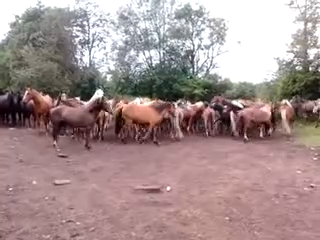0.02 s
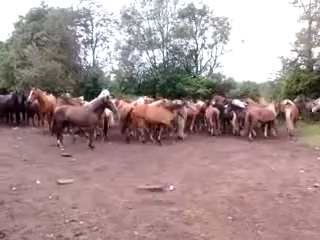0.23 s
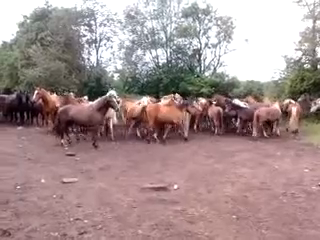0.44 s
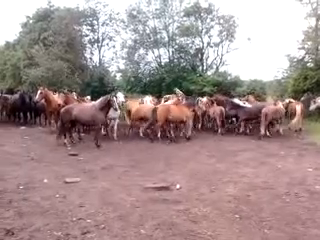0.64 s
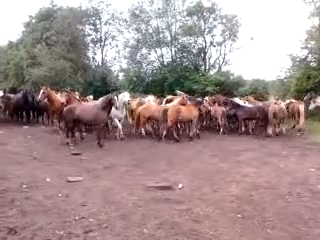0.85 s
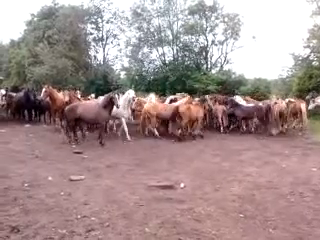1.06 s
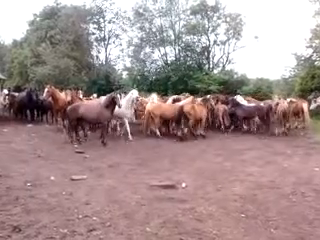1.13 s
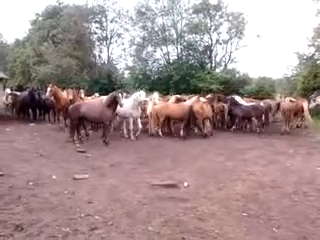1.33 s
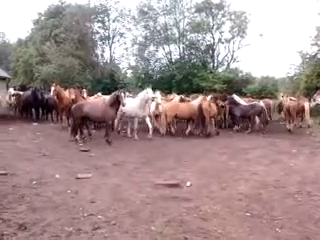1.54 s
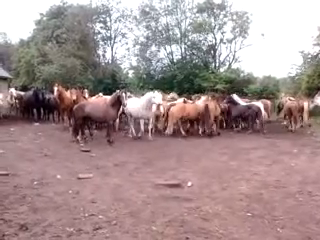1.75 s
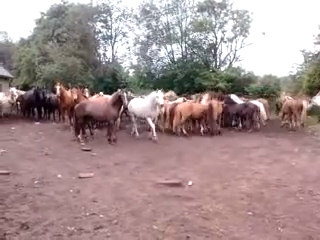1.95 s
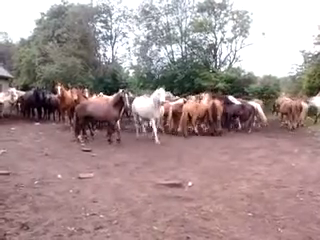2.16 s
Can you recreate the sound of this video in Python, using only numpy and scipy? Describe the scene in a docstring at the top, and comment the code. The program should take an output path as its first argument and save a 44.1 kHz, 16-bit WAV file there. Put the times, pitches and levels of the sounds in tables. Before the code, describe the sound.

One shrill horse whinny sinks into a low fluttering snort over faint outdoor noise.

```python
"""In an open paddock a horse whinnies once. The call is biphonic: a high whistle and a lower voice sound
together in the throat, and one modulates the other into sum tones. It roughens, sinks and breaks into
hoarse pulses over low grunts, while air hisses through the nose and the nostrils flutter and snap.
Soft moans frame the call. A faint rush of air follows over steady outdoor noise, and a low rumble
starts at the very end."""
import sys
import numpy as np
from scipy import signal
from scipy.fft import rfft, irfft, next_fast_len
from scipy.io import wavfile
from scipy.ndimage import uniform_filter1d

SR = 44100
rng = np.random.default_rng(int(sys.argv[2]) if len(sys.argv) > 2 else 0)


def generate_wav(sig):
    """Save sig (samples, or channels by samples) to the path in sys.argv[1] as 16-bit PCM at SR."""
    pcm = np.round(np.clip(np.atleast_2d(sig).T, -1, 1) * 32767).astype(np.int16)
    wavfile.write(sys.argv[1], SR, pcm)


N = 97020
T = np.arange(N) / SR

# the two fundamentals of the call: t/s, voice f/Hz, whistle f/Hz
PITCH = [(.095, 644.5, 833), (.13, 580, 1196), (.198, 516, 1180), (.25, 661, 1345), (.288, 581.4, 1315),
         (.322, 584.3, 1311), (.352, 668, 1365), (.398, 606, 1345), (.45, 679.2, 1365), (.525, 600, 1315),
         (.56, 684.7, 1360), (.618, 608, 1445), (.636, 502.4, 1137), (.68, 627.3, 1378),
         (.722, 648.2, 1399), (.755, 485.6, 1164), (.79, 509.2, 1174), (.825, 575.8, 1263),
         (.9, 490, 983.3), (.955, 489.1, 1188), (1.03, 431.3, 898), (1.11, 520, 1048)]
# envelope of the call: t/s, level/dB
CALL_LEVEL = [(.085, -42), (.14, -24), (.205, -17.5), (.228, -21.5), (.246, -24.5), (.275, -22.5),
              (.33, -26.5), (.43, -23), (.54, -24), (.63, -21.5), (.69, -24.5), (.76, -22), (.85, -23),
              (.9, -24.5), (.97, -21.5), (1.06, -33.5)]
# texture of the call: t/s, gain of voice and sum tones/dB, roughness (0-1)
TEXTURE = [(.1, -32, 0.42), (.165, -27, 0.2), (.195, -5.5, 0.16), (.23, -13, .15), (.265, -5, 0.72),
           (.4, -5, 0.87), (.56, -1, 0.45), (.76, -5, 0.69), (.9, -3, 1)]
# the folds lock and the call surges clear: centre t/s, gain/dB
SURGES = [(.305, 7), (0.357, 4.5), (0.456, 5), (.72, 3), (.855, 2.5), (.953, 4)]
# formants of throat and nose: f/Hz, gain/dB
FORMANTS = [(300, -27), (520, -6), (720, -7), (1200, 1.5), (1380, -8.5), (1650, 7.5), (1830, 3),
            (2050, 8.5), (2430, -14.5), (2740, 6), (3000, -8), (3300, -1), (4700, -26.5), (5800, -1),
            (9500, -25.5)]
# hoarse pulses ending the call: centre t/s, half-width/s, level/dB
PULSES = [(1.099, 0.046, -23), (1.234, 0.05, -24.5), (1.366, 0.038, -32), (1.509, 0.037, -35)]
# their resonances: f/Hz, gain/dB
PULSE_COLOUR = [(300, -6), (620, -7.5), (930, 2.5), (1330, -8), (1600, 7), (1830, -8.5), (2150, 6.5),
                (2500, -13.5), (3200, -5), (5000, -31)]
# grunts of the throat: centre t/s, f/Hz, level/dB
GRUNTS = [(.91, 160, -30), (1.005, 185, -32), (1.062, 175, -35), (1.115, 204.2, -31.5), (1.25, 165, -33),
          (1.515, 143, -30)]
# air through the nose: t/s, level/dB
AIR_LEVEL = [(.1, -76), (.17, -46), (.3, -39), (.55, -37), (.6, -33), (.65, -37.5), (.715, -32),
             (.77, -43.5), (.83, -31), (.92, -39.5), (1.01, -37), (1.22, -48.5), (1.54, -41), (1.6, -60)]
# spectrum of that air: f/Hz, gain/dB
AIR_COLOUR = [(2500, 2), (4800, -8), (6600, -8.5), (8100, 2), (9500, -14), (15500, -34)]
# nostril flutter: t/s, level/dB
FLUTTER_LEVEL = [(.87, -42), (.9, -36), (1.1, -38.5), (1.29, -29), (1.43, -35.5), (1.56, -34.5),
                 (1.63, -46.5)]
# resonances of the nose: f/Hz, gain/dB
NOSE_COLOUR = [(55, -13.5), (165, 1), (350, -3.5), (1300, -23.5), (1620, -3), (2500, -29), (8000, -29),
               (14000, -41.5)]
# snaps of the nostrils: t/s, level/dB
SNAPS = [(1.417, -20), (1.437, -17.5), (1.564, -22), (1.587, -24.5)]
# ring of a snap: f/Hz, gain/dB
SNAP_COLOUR = [(1100, -26), (1620, 0), (2050, 4), (2400, -15), (8200, -28), (13000, -60)]
# spits of air from the nose: t/s, level/dB
SPITS = [(1.162, -29), (1.295, -26.5)]
# low puffs between the pulses: centre t/s, level/dB
PUFFS = [(1.175, -40), (1.31, -35), (1.45, -35), (1.56, -41)]
# spectrum of a puff: f/Hz, gain/dB
PUFF_COLOUR = [(30, -29), (62, -9), (95, -12), (200, -24.5)]
# moans: start t/s, duration/s, start f/Hz, end f/Hz, level/dB
MOANS = [(.01, 0.12, 730, 598, -40.5), (1.565, 0.15, 580, 526, -44), (1.634, 0.081, 716, 680, -42)]
# resonances of the nearly closed mouth: f/Hz, gain/dB
MOAN_COLOUR = [(600, -4.5), (1400, -17), (2050, -11.5)]
# rush of air after the call: t/s, level/dB
RUSH_LEVEL = [(1.6, -49.5), (1.98, -45.5), (2.12, -55.5)]
# spectrum of the rush: f/Hz, gain/dB
RUSH_COLOUR = [(1200, -11), (1520, 5.5), (2300, -1), (4300, -3), (5700, -24), (8000, -13)]
# closing rumble: t/s, level/dB
RUMBLE_LEVEL = [(2.11, -66), (2.16, -39), (2.195, -29)]
# spectrum of the rumble: f/Hz, gain/dB
RUMBLE_COLOUR = [(70, 14.5), (200, 7.5), (550, -20.5), (3000, -27)]
# spectrum of the outdoor noise: f/Hz, gain/dB
OUTDOOR_COLOUR = [(30, -1.5), (70, 7.5), (155, 4), (230, -2), (750, -2.5), (1100, -7), (8700, -8.5),
                  (10500, -20), (15500, -29)]

WAVER, JITTER = .0024, .0098  # relative pitch spread: constant part, part at full roughness
RASP_HZ, SLIP_HZ = 152, 70  # bandwidths of pitch jitter and phase slip
NASAL_MODES_HZ, NASAL_WIDTH_HZ = (5420, 5855, 6670, 7300, 8030), 250


def whinny():
    """Source and filter: the larynx excites the formants, then drives the closing hoarse pulses."""
    source = larynx()
    surge_db = sum(db * swell(at, .012) for at, db in SURGES)
    call = even(colour(source, FORMANTS), size=900) * envelope(CALL_LEVEL) * undb(surge_db)
    return call + hoarse_pulses(source) + shriek()


def larynx(voice_db=-3.5, growl_hz=150):
    """Biphonation: the voice modulates the whistle, giving tones at the sums of their frequencies."""
    locked = sum(swell(at, .012) for at, _ in SURGES)
    rough = np.clip(curve(TEXTURE, column=2) * (1 - locked), 0, 1)
    voice_gain = undb(curve(TEXTURE) + 5 * locked)
    # uneven beating of the folds splits the tones into sidebands
    growl = overtones(growl_hz * (1 + .2555 * wobble(39.8)), 0, count=1)
    voice_hz = curve(PITCH) * jitter(rough)
    whistle_hz = curve(PITCH, column=2) * jitter(rough)
    voice = signal.hilbert(overtones(voice_hz, -4, count=14))
    whistle = signal.hilbert(overtones(whistle_hz, -8, count=6))
    # multiplying analytic signals adds their frequencies
    sum_tones = whistle * signal.hilbert(overtones(voice_hz, -11, count=3))
    parts = whistle, voice_gain * undb(voice_db) * voice, voice_gain * sum_tones
    return sum(rasp(part, rough, growl) for part in parts)


def jitter(rough):
    """Frequency modulation: a random pitch factor that spreads wider as the call roughens."""
    return 1 + WAVER * wobble(74) + JITTER * rough * wobble(RASP_HZ)


def rasp(tone, rough, growl, slip_rad=1.5):
    """Amplitude and phase modulation break up an analytic tone where the call is rough."""
    amplitude = 1 + rough * (.8 * wobble(2 * RASP_HZ) + .65 * growl)
    slip = slip_rad * rough ** 2.2 * wobble(SLIP_HZ)
    return np.real(tone * amplitude * np.exp(1j * slip))


def hoarse_pulses(source, air_db=6, close_at_s=1.27, closing_s=.071, closed_hz=1300):
    """Aspiration noise outweighs the voice; the closing mouth low-passes the last pulses."""
    breathy = (unit(source) + undb(air_db) * rng.standard_normal(N)) * undb(2 * wobble(89))
    bright = even(colour(breathy, PULSE_COLOUR))
    dull = even(lowpass(bright, closed_hz))
    closed = np.clip((T - close_at_s) / closing_s, 0, 1)
    pulses = sum(undb(db) * swell(at, half) for at, half, db in PULSES)
    return pulses * even((1 - closed) * bright + closed * dull)


def shriek():
    """The whistle's second harmonic rings out at the height of the call."""
    hz = 2 * curve(PITCH, column=2) * (1 + WAVER * wobble(RASP_HZ))
    octave = unit(overtones(hz, 0, count=1)) * (1 + .5 * wobble(SLIP_HZ))
    return undb(-26.5) * swell(.43, .1) * octave


def grunts():
    """Aperiodic voicing: short, unsteady low notes of the throat under the end of the call."""
    out = 0
    for at, hz, db in GRUNTS:
        tone = unit(overtones(hz * (1 + .1 * wobble(50)), -9, count=4))
        out = out + undb(db) * swell(at, .028) * tone
    return out


def nasal_air():
    """Air hisses through the nose, whose narrow modes resonate with the overtones of the voice."""
    hiss = noise(AIR_COLOUR) * undb(1.5 * wobble(54))
    voice_hz = curve(PITCH) * (1 + .0107 * wobble(RASP_HZ))
    buzz = overtones(voice_hz, 0, count=17) + rng.standard_normal(N)
    modes = [signal.iirpeak(hz, hz / NASAL_WIDTH_HZ, fs=SR) for hz in NASAL_MODES_HZ]
    ring = even(sum(signal.lfilter(b, a, signal.lfilter(b, a, buzz)) for b, a in modes))
    fade = np.clip((1 - T) / .33, 0, 1)  # gone by 1 s, as the call sinks
    return envelope(AIR_LEVEL) * (hiss + undb(2) * ring * fade)


def nostril_flutter(flap_hz=65.84, leak_decay_s=.0093):
    """Impulse excitation: uneven flaps ring the nose, each letting out a decaying leak of air."""
    timing, strength = rng.standard_normal((200, 2)).T
    onsets = (np.cumsum(np.exp(.28 * timing)) * SR / flap_hz).astype(int)
    flaps = np.bincount(onsets, undb(2 * strength), N)[:N]
    leak = signal.lfilter([1], [1, -np.exp(-1 / (leak_decay_s * SR))], flaps) * rng.standard_normal(N)
    return even(colour(flaps + .15 * leak, NOSE_COLOUR), size=2000) * envelope(FLUTTER_LEVEL)


def nostril_bursts():
    """Noise transients: sharp snaps and spits decay exponentially; low puffs swell smoothly."""
    snaps = bursts(SNAPS) * even(noise(SNAP_COLOUR), size=200)
    spits = bursts(SPITS) * noise(AIR_COLOUR)
    puffs = sum(undb(db) * swell(at, .037) for at, db in PUFFS) * even(noise(PUFF_COLOUR))
    return snaps + spits + puffs


def moans():
    """Falling glides of the voice alone, filtered by the resonances of the nearly closed mouth."""
    out = 0
    for start, length, from_hz, to_hz, db in MOANS:
        along = np.clip((T - start) / length, 0, 1)
        hz = (from_hz + (to_hz - from_hz) * along) * (1 + .0409 * wobble(160))
        tone = unit(colour(overtones(hz, 0, count=4), MOAN_COLOUR))
        out = out + undb(db) * np.sin(np.pi * along) * tone
    return out


def rush():
    """Broadband flow noise: a faint rush of air after the call."""
    return noise(RUSH_COLOUR) * envelope(RUSH_LEVEL)


def paddock(x, echo_db=-8, t60_s=.077):
    """Scattering from the herd and trees adds a short, weak tail after 8 ms."""
    tail = rng.standard_normal(N) * undb(-60 * T / t60_s) * (T > .008)
    return x + undb(echo_db) * signal.fftconvolve(x, tail / np.sqrt(np.sum(tail ** 2)))[:N]


def background(outdoor_db=-45.5):
    """Ambient noise floor: nearly stationary outdoor noise, joined at the end by a low rumble."""
    steady = noise(OUTDOOR_COLOUR) * undb(outdoor_db + .6 * wobble(4))
    return steady + even(noise(RUMBLE_COLOUR)) * envelope(RUMBLE_LEVEL)


def undb(db):
    """Decibels to amplitude ratio."""
    return 10 ** (np.asarray(db) / 20)


def unit(x):
    """Normalisation to rms 1."""
    return x / np.sqrt(np.mean(x ** 2))


def even(x, size=1500):
    """Normalisation of the running rms over size samples to 1."""
    return x / np.sqrt(np.maximum(uniform_filter1d(x ** 2, size), 0) + 1e-12)


def curve(rows, column=1):
    """Linear interpolation of a table column in time."""
    rows = np.array(rows, float)
    return np.interp(T, rows[:, 0], rows[:, column])


def envelope(rows):
    """Amplitude envelope from (t/s, level/dB): silent before the first row, decaying after the last."""
    release = np.exp(-np.maximum(T - rows[-1][0], 0) / .011)
    return undb(curve(rows)) * (T > rows[0][0]) * release


def swell(at, half_s):
    """Gaussian window, down to 1/e at half_s from its centre."""
    return np.exp(-((T - at) / half_s) ** 2)


def bursts(rows, decay_s=.0062):
    """Exponential decays from sudden onsets (t/s, level/dB)."""
    return sum(undb(db) * (T >= at) * np.exp(-np.abs(T - at) / decay_s) for at, db in rows)


def overtones(hz, db_per_octave, count):
    """Harmonic series on a moving fundamental."""
    phase = 2 * np.pi * np.cumsum(hz) / SR
    return sum(undb(db_per_octave * np.log2(k)) * np.cos(k * phase) for k in range(1, count + 1))


def colour(x, points):
    """Minimum-phase filter through (f/Hz, gain/dB) points."""
    size = 2 * next_fast_len(N)
    hz, db = np.array(points, float).T
    f = np.maximum(np.arange(size // 2 + 1) * SR / size, 1)
    octaves_outside = np.maximum(np.log2(hz[0] / f), 0) + np.maximum(np.log2(f / hz[-1]), 0)
    gain_db = np.interp(np.log(f), np.log(hz), db) - 20 * np.minimum(octaves_outside, 2)
    cepstrum = irfft(np.log(undb(gain_db)))
    cepstrum[1:size // 2] *= 2  # folding makes the filter causal
    cepstrum[size // 2 + 1:] = 0
    return irfft(rfft(x, size) * np.exp(rfft(cepstrum)))[:N]


def lowpass(x, hz):
    """Fourth-order roll-off above hz."""
    return signal.sosfilt(signal.butter(4, hz, fs=SR, output="sos"), x)


def noise(points):
    """Spectrally shaped noise of rms 1."""
    return unit(colour(rng.standard_normal(N), points))


def wobble(hz):
    """Random fluctuation of rms 1, band-limited to about hz."""
    return unit(lowpass(rng.standard_normal(N), hz))


def scene():
    """Superposition of the horse, its scattered sound and the background, in one channel."""
    horse = whinny() + grunts() + nasal_air() + nostril_flutter() + nostril_bursts() + moans() + rush()
    return (paddock(horse) + background())[None]


def record(dry, top_hz=15700):
    """Band limiting: a steep low-pass removes the highest treble."""
    return signal.sosfilt(signal.ellip(10, .2, 80, top_hz, fs=SR, output="sos"), dry)


dry = scene()
out = record(dry)
generate_wav(out)
```